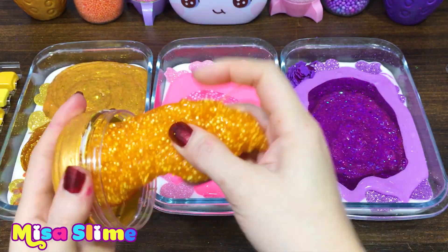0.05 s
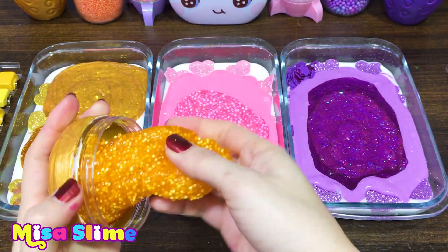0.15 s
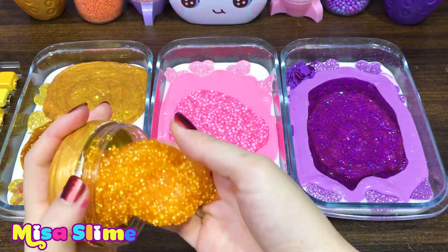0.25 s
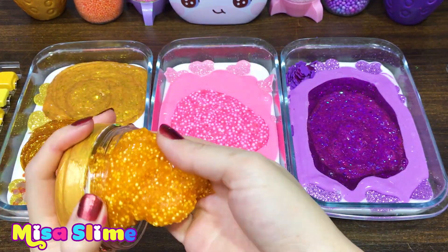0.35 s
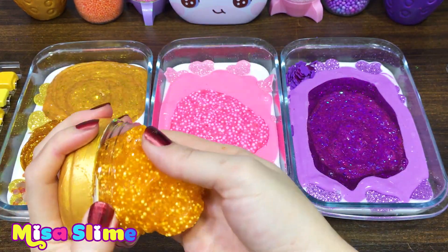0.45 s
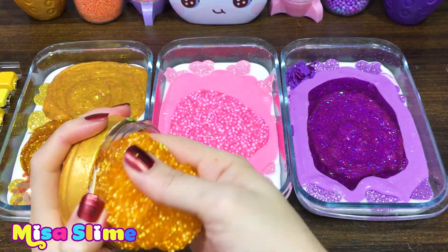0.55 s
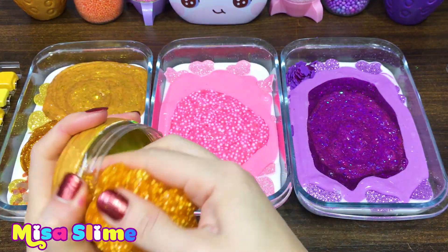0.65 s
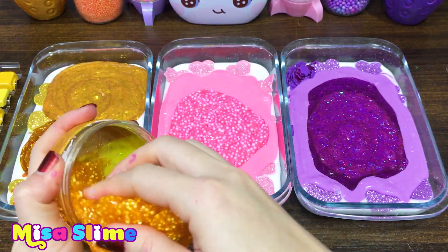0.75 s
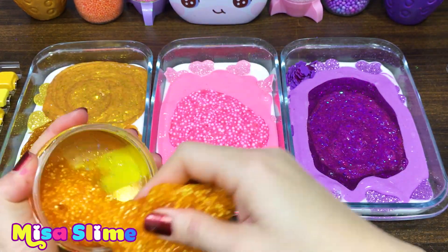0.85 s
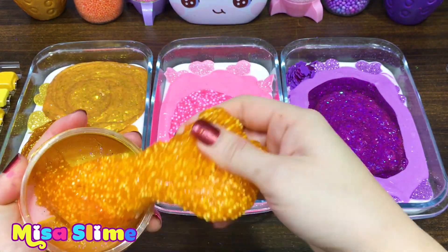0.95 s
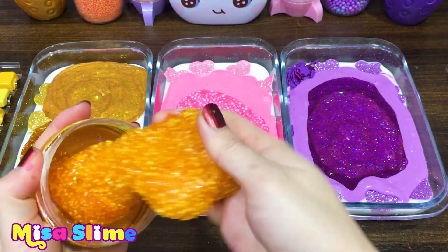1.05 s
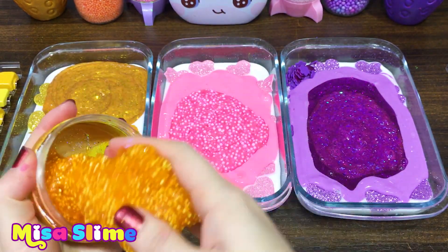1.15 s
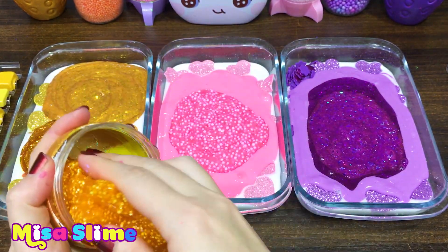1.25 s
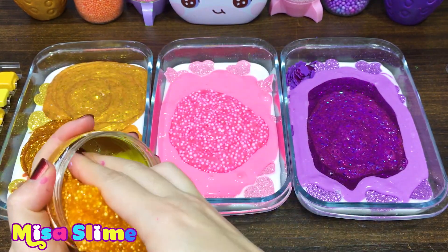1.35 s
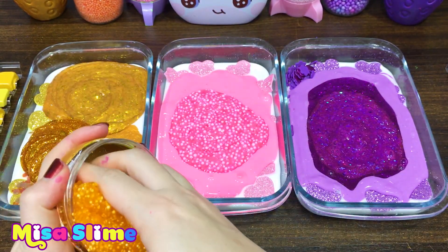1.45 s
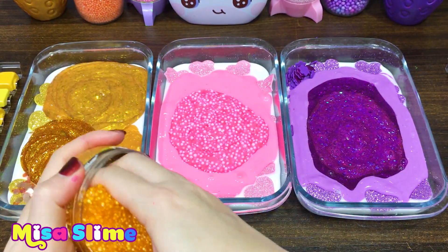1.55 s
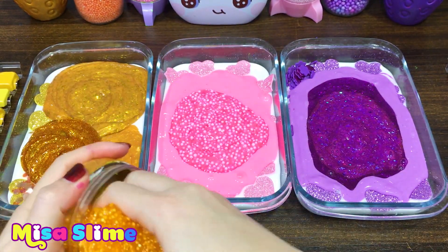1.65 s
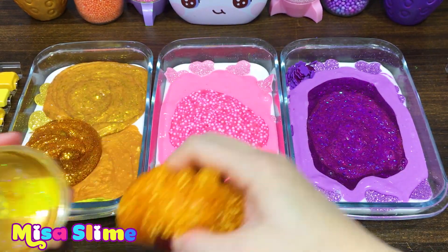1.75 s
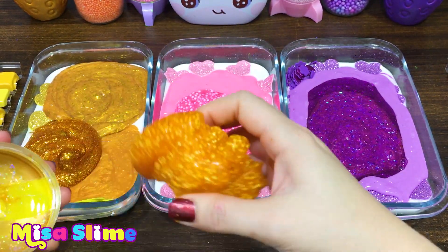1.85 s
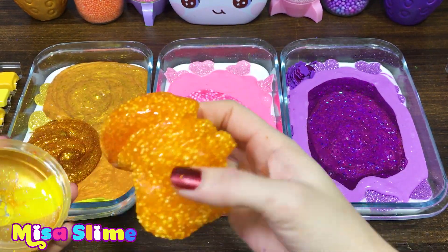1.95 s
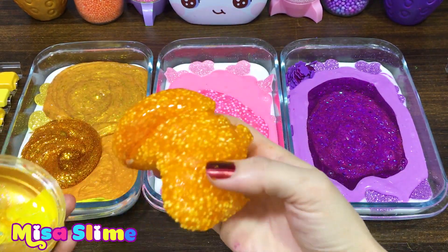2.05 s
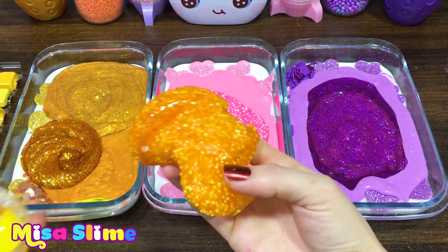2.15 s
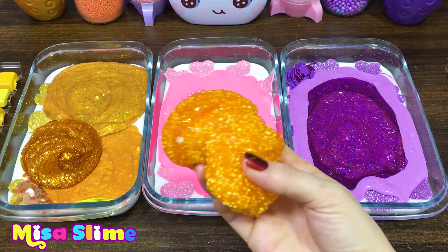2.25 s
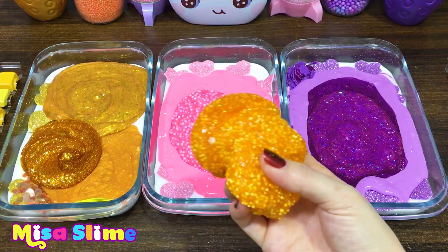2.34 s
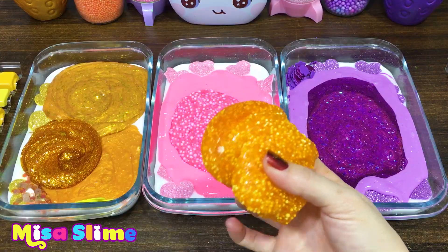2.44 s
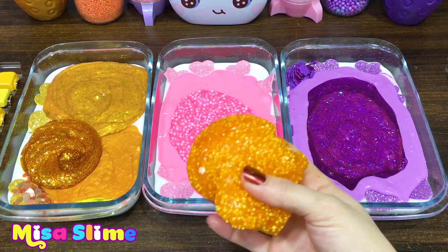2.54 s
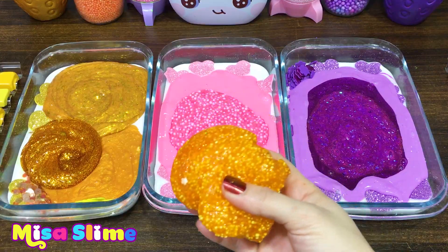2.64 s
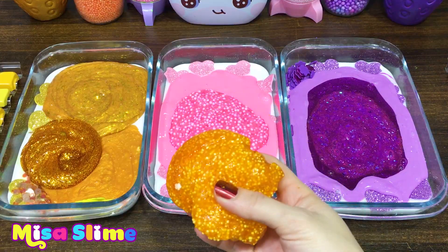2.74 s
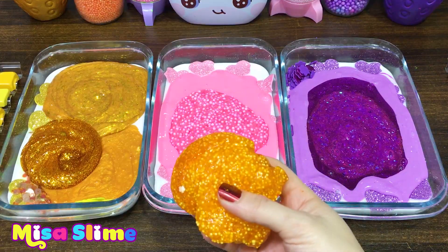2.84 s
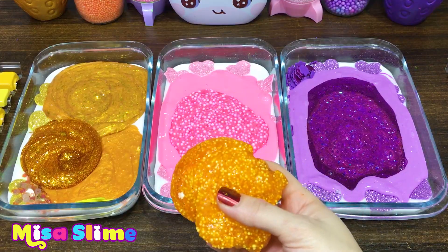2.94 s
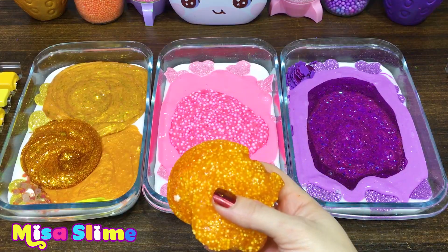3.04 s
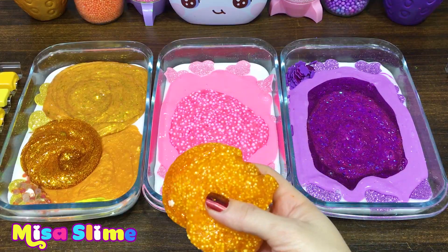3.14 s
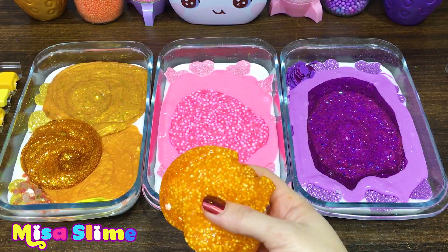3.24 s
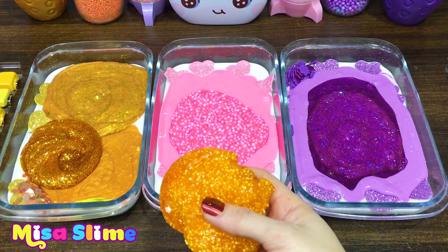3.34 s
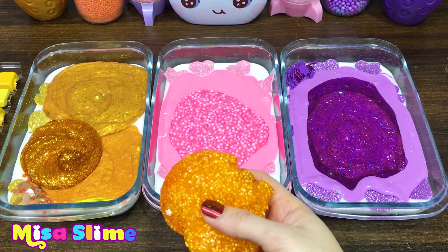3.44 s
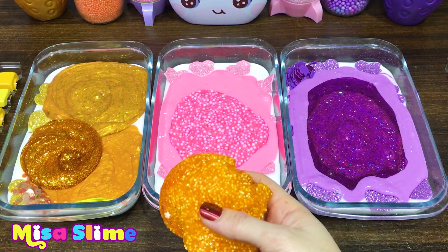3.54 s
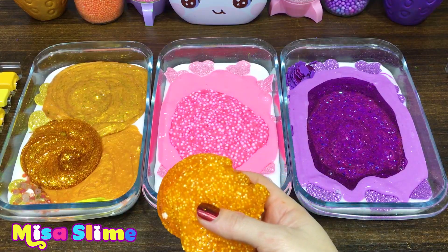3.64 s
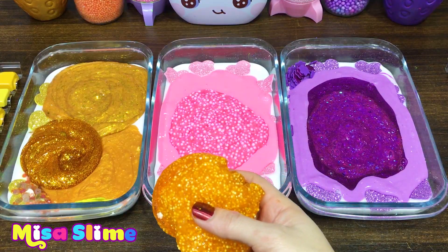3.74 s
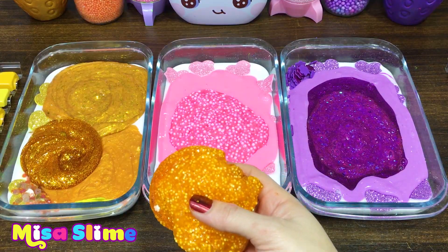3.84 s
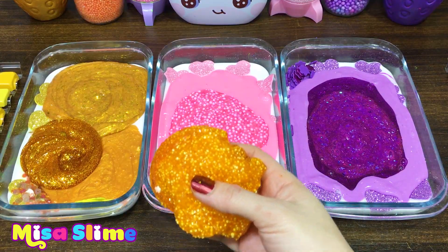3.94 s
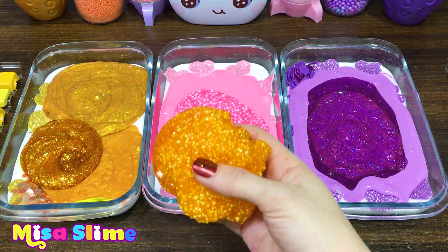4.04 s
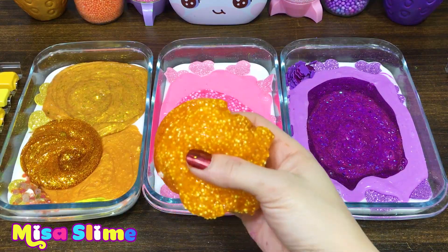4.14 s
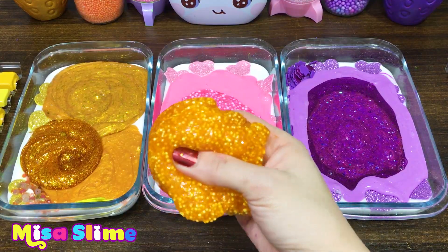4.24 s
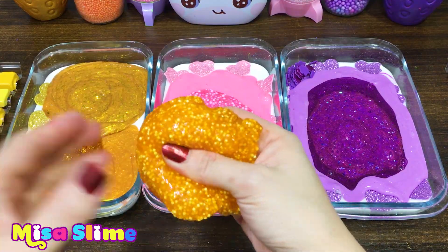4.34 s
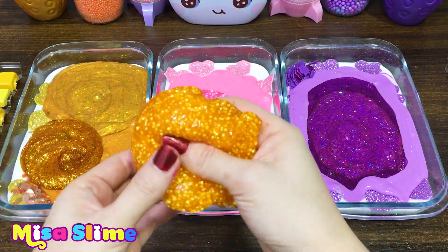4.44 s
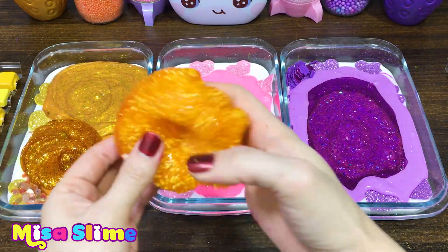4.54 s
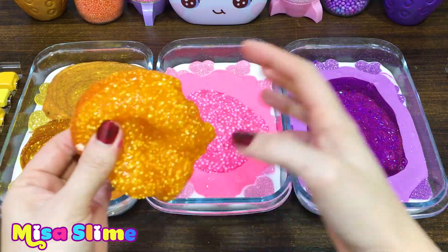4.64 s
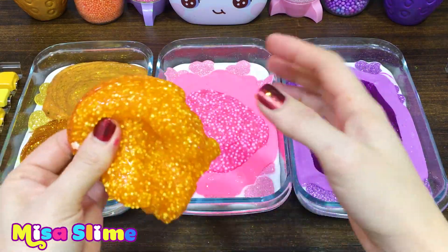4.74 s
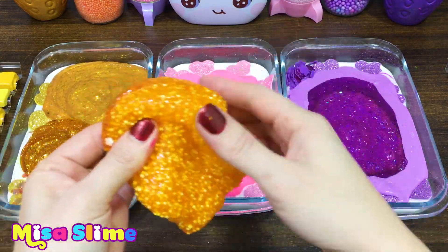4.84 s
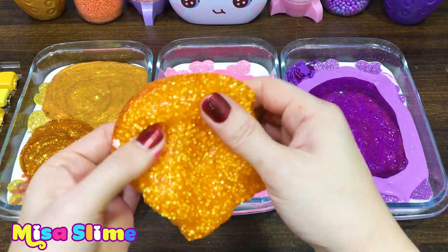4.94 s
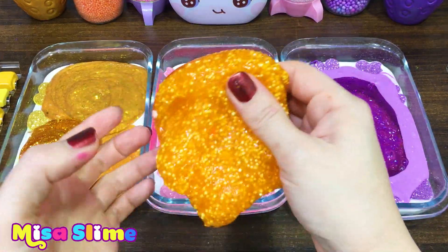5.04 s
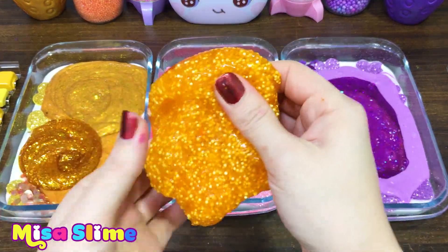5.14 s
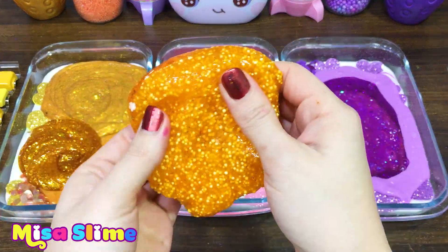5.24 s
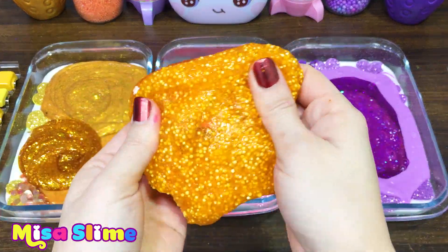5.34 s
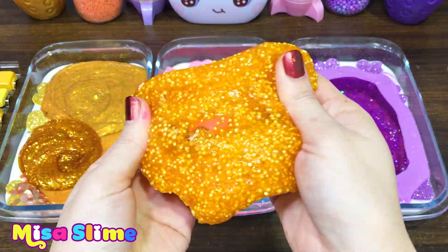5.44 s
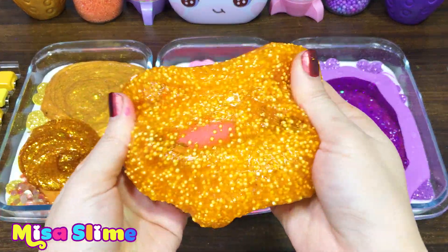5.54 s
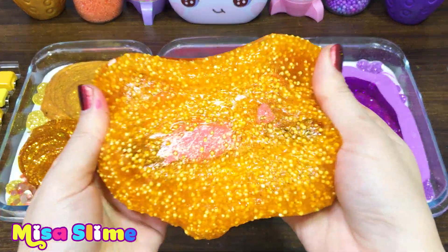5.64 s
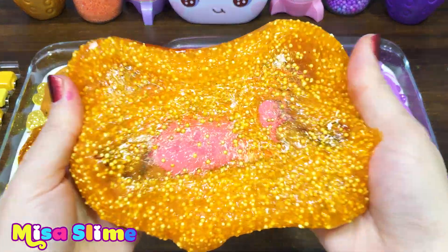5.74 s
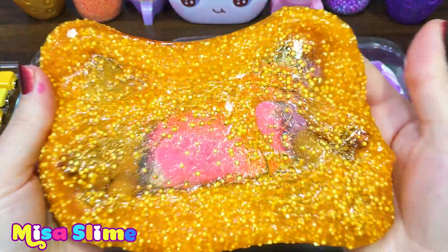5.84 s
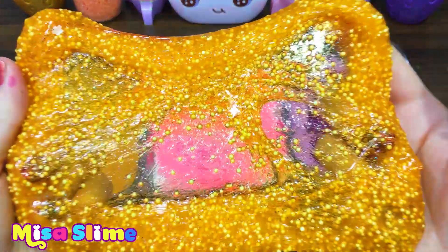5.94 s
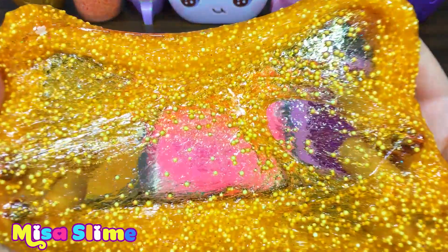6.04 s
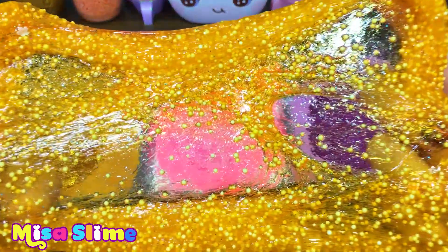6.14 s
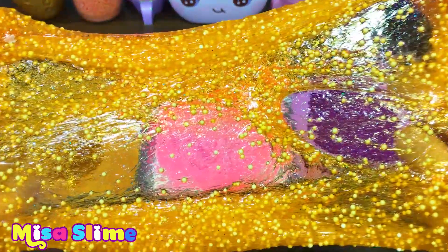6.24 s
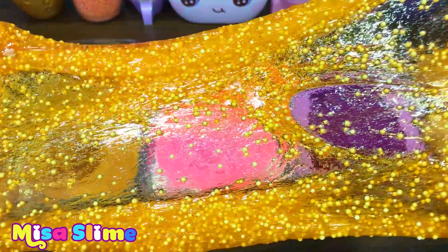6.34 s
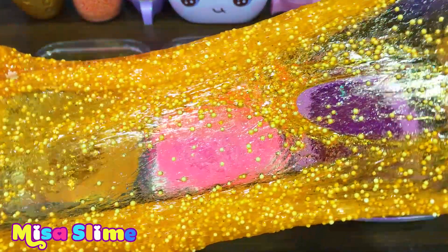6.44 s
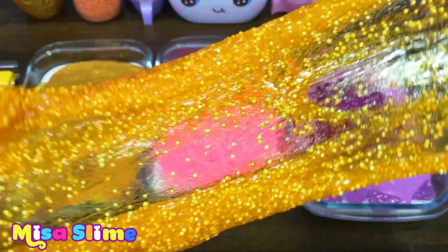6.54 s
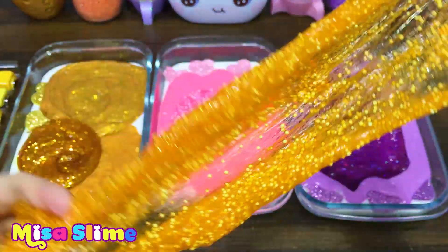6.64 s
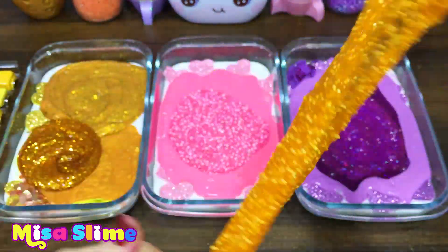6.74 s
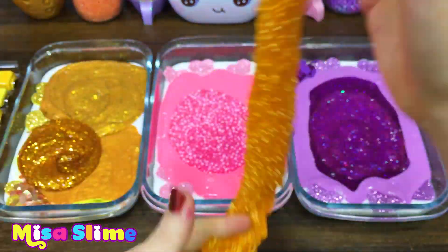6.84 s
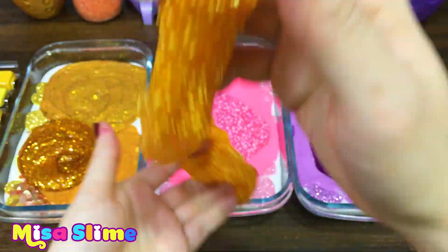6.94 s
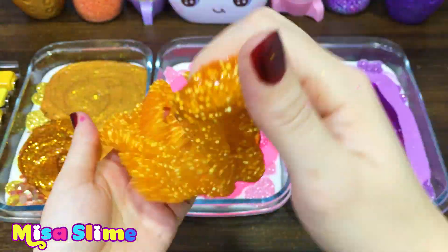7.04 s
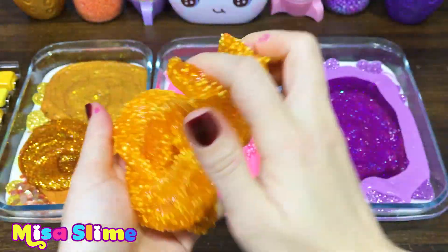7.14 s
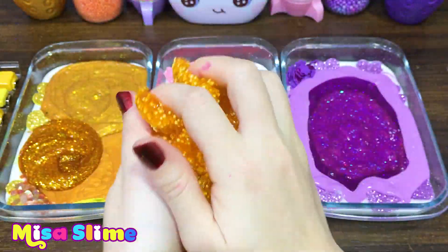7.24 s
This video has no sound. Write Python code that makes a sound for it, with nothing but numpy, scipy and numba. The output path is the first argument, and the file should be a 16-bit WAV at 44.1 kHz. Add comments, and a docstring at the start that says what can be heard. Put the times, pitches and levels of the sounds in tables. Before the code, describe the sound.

Close, detailed slime handling in a quiet small room with faint steady low rumble and hiss. From 0 to 2 s, fingers pull beady, sticky slime from a small plastic tub: short uneven bursts of bright dense crackle, sharp snaps and hollow pops, busiest near 0.2, 0.9 and 1.1 s. Small squelches and dull slaps join around 1.6 s, and the strongest wet pop comes at 1.9 s. Sparse clicks fade until about 2.9 s. Between 3.2 and 4.2 s the tub is put aside, tapping lightly on the table, with a quick cluster of knocks and the hardest at 4.1 s. After a pause, a sudden loud sticky crackle and soft thud arrive at 4.7 s, with another pop at 5.2 s. From 5.5 to 7.3 s the slime is stretched between two hands: thinner, quieter fizz, small scattered pops, dull rubbing, soft flops and a gentle low rumble.

```python
"""Glitter slime is pulled out of a small plastic tub, close by, in a quiet room of steady rumble and hiss.
Tearing threads crackle as click trains, air pockets ring over the hollow tub, fingers rub as dull noise;
films pop, folds squelch as bursts of filtered noise, and the lump slaps the hand with a damped thud.
From 3.2 to 4.2 s the tub is put aside: light knocks ring tub and table as damped modes.
From 4.7 s the slime is pulled again, then squeezed and stretched between two hands, with a low rumble."""
import sys
import numpy as np
from scipy import signal
from scipy.fft import rfft, irfft
from scipy.io import wavfile
from scipy.ndimage import uniform_filter1d
from numba import njit

SR = 44100
rng = np.random.default_rng(int(sys.argv[2]) if len(sys.argv) > 2 else 0)


def master_out(mix):
    """Clip the mix to full scale and print it as 16-bit PCM to the path in sys.argv[1]."""
    frames = np.transpose(np.atleast_2d(mix))
    ceiling = np.clip(frames, -1, 1)
    pcm = np.round(ceiling * 32767).astype(np.int16)
    wavfile.write(sys.argv[1], SR, pcm)


N = 321048
TIME_S = np.arange(N) / SR


def undb(db):
    """Decibels to amplitude."""
    return 10 ** (np.asarray(db) / 20)


def unit(x):
    """Scale to rms 1."""
    return x / np.sqrt(np.mean(x ** 2))


def burst(x, seconds):
    """Scale a short sound to the energy of rms 1 held for that long."""
    return x * np.sqrt(seconds * SR / np.sum(x ** 2))


def even(x, seconds):
    """Scale to a running rms near 1, keeping the fine grain."""
    size = int(seconds * SR / 2)
    power = uniform_filter1d(uniform_filter1d(x ** 2, size), size)
    floor = np.mean(x ** 2) / 100
    return x / np.sqrt(power + floor)


def add(out, start_s, x):
    """Mix x into out at start_s."""
    i = max(int(start_s * SR), 0)
    out[i:i + len(x)] += x[:N - i]


def noise(count):
    """White noise, rms about 1."""
    return rng.standard_normal(count)


def band(x, hz, width_hz):
    """One resonance."""
    return signal.lfilter(*signal.iirpeak(hz, hz / width_hz, fs=SR), x)


def double_band(x, hz, width_hz):
    """Two equal resonances in series: steeper skirts."""
    return band(band(x, hz, width_hz), hz, width_hz)


def colour(x, points, size=4096):
    """Causal minimum-phase filter through (freq_hz, gain_db) points."""
    hz, db = np.transpose(points)
    bins_hz = np.maximum(np.arange(size // 2 + 1) * SR / size, 1)
    gain = undb(np.interp(np.log(bins_hz), np.log(hz), db))
    cepstrum = irfft(np.log(gain))
    # fold the cepstrum onto positive time
    cepstrum[1:size // 2] *= 2
    cepstrum[size // 2 + 1:] = 0
    impulse = irfft(np.exp(rfft(cepstrum)))
    return signal.fftconvolve(x, impulse)[:len(x)]


def fade(t, t60):
    """Exponential decay, -60 dB at t60 seconds."""
    return np.exp(-np.log(1000) * t / t60)


def ring(t, hz, t60):
    """A damped sine."""
    return np.sin(2 * np.pi * hz * t) * fade(t, t60)


def walk(steps_per_s):
    """A smooth random drift, zero mean, spread a little below 1."""
    k = int(SR / steps_per_s)
    steps = np.repeat(noise(N // k + 1), k)
    return 0.9 * uniform_filter1d(steps, k)[:N]


@njit
def glide(x, hz, damping):
    """A state-variable resonance whose centre moves every sample."""
    y, b, l = np.empty(len(x)), 0., 0.
    for i in range(len(x)):
        g = np.tan(np.pi * hz[i] / SR)
        v = (b + g * (x[i] - l)) / (1 + g * (g + damping))
        b, l, y[i] = 2 * v - b, l + 2 * g * v, damping * v
    return y


def clicks(rate_per_s, spread_db):
    """Random impulses of either sign and widely scattered size."""
    at = np.flatnonzero(rng.random(N) < rate_per_s / SR)
    out = np.full(N, 1e-18)
    size, side = rng.standard_normal((len(at), 2)).T
    out[at] = np.sign(side) * undb(spread_db * np.clip(size, -2, 2.5))
    return out


def grains(rate_per_s, low_hz, high_hz, t60_cycles, spread_db, count=16):
    """Random tiny cavities bursting: each rings a few cycles at one of count pitches, at scattered strength."""
    out = np.zeros(N)
    for hz in np.geomspace(low_hz, min(high_hz, SR / 2 - 2000), count):
        pole = np.exp((2j * np.pi - np.log(1000) / t60_cycles) * hz / SR)
        feedback = [1, -2 * pole.real, abs(pole) ** 2]
        hits = clicks(rate_per_s / count, spread_db)
        out += hz / low_hz * signal.lfilter([0, pole.imag], feedback, hits)
    return out


# steady room spectrum: freq_hz, gain_db
ROOM_SPECTRUM = [(15, -74), (25, -21.5), (47, -8.5), (70, -2.5), (134, -7.5), (212, -10), (354, -13),
                 (394, -12.5), (463, -13.5), (516, -17), (1100, -23), (1440, -24), (1890, -23.5),
                 (3520, -27), (6300, -28.5), (8300, -27.5), (13500, -32), (16000, -30.5)]
ROOM_DB = -65
HANDS_START_S, HANDS_END_S, HANDS_FADE_S, HANDS_DB = 5.6, 7.28, .25, -68.5


def background():
    """Steady room rumble and hiss, plus the low rumble of near hands during the big stretch."""
    air = unit(colour(noise(N), ROOM_SPECTRUM))
    hands = unit(band(band(noise(N), 86.2, 88.1), 89.0, 210))
    edge_s = np.minimum(TIME_S - HANDS_START_S, HANDS_END_S - TIME_S)
    near = np.clip(edge_s / HANDS_FADE_S, 0, 1)
    return undb(ROOM_DB) * air + undb(HANDS_DB) * near * hands


PULL_ATTACK_S, PULL_RELEASE_S = .017, .011  # time constants of gripping and letting go


def grip(start_s, end_s):
    """Exponential attack up to start_s, hold to end_s, exponential release."""
    attack = np.maximum(start_s - TIME_S, 0) / PULL_ATTACK_S
    release = np.maximum(TIME_S - end_s, 0) / PULL_RELEASE_S
    return np.exp(-attack - release)


# pulls that peel slime off plastic or skin until it lets go:
# start_s, length_s, end_snap_db, swell_db (rise from start to end), pocket_db (relative to snaps)
PULLS = [(0.0, 0.029, -44, -4, -5), (0.039, 0.19, -47.5, 5, -9.5), (0.251, 0.053, -66, -5, -1.5),
         (.345, .085, -56, 4, -5), (0.754, 0.13, -52, 8, -4), (0.906, 0.098, -54, -1, -5.5),
         (1.015, 0.11, -42, 5, -7.5), (1.14, 0.068, -53, 1, -3.5), (1.258, 0.032, -52.5, 4, -5),
         (1.506, 0.19, -60, 1, -3.5), (1.719, 0.17, -50.5, 4, 1), (1.888, 0.038, -34, 14, 1),
         (1.947, .15, -68, -13, -15), (2.263, 0.054, -67, -5, -17), (2.582, 0.026, -62.5, 3, -5),
         (2.942, 0.027, -69, 2.5, -11), (4.718, 0.01215, -50, 5, -6), (4.738, .03, -48, -5, -9.5),
         (4.795, 0.04, -51.5, 9, -4), (5.181, 0.051, -52.5, 0, -8), (5.571, 0.2, -67, 3, -19),
         (5.784, .35, -61, -0.5, -14), (5.968, .025, -51, 6, -25), (6.15, 0.31, -71, -8, -8),
         (6.619, 0.14, -62, 6, -8.5), (6.859, 0.067, -60.5, 7, -1.5)]
# slime clinging to moving fingers between pulls: start_s, end_s, level_db
CLINGS = [(0, 2.65, -73), (5.47, 7.28, -75)]
CLING_POCKET_DB = -3.5  # relative to the cling
JERK_DB, JERKS_PER_S = 1.0, 45  # scale and step rate of the random level drift


def effort():
    """Snap and pocket levels in dB: each pull swells or eases evenly, and the slime comes away in small jerks."""
    snaps = pockets = np.full(N, 1e-5)
    for start_s, length_s, end_db, swell_db, pocket_db in PULLS:
        end_s = start_s + length_s
        remaining = np.clip((end_s - TIME_S) / length_s, 0, 1)
        pull = grip(start_s, end_s) * undb(end_db - swell_db * remaining)
        snaps = np.maximum(snaps, pull)
        pockets = np.maximum(pockets, pull * undb(pocket_db))
    for start_s, end_s, level_db in CLINGS:
        cling = grip(start_s, end_s) * undb(level_db)
        snaps = np.hypot(snaps, cling)
        pockets = np.hypot(pockets, cling * undb(CLING_POCKET_DB))
    jerks_db = JERK_DB * walk(JERKS_PER_S)
    return 20 * np.log10(snaps) + jerks_db, 20 * np.log10(pockets) + jerks_db


# spectrum of the snapping threads: freq_hz, gain_db
SNAP_SPECTRUM = [(700, -24), (1300, -8), (2000, -10), (2620, -5), (3200, -5), (4300, -5), (4900, -3.5),
                 (5700, -8.5), (7800, -1.5), (9300, -5.5), (12000, -3), (16000, -7.5)]
SNAPS_PER_S, SNAPS_AT_DB, SNAP_GROWTH = 2100, -54.5, .65  # rate at that level, power-law exponent
TUB_HZ, TUB_WIDTH_HZ = 1680, 200
TUB_SHARE_FULL, TUB_SHARE_EMPTY = 0.41, 0.81
TUB_EMPTY_S, TUB_AWAY_S = 1.95, 2.6


def peeling():
    """Threads snap and air pockets open as the slime lets go; a harder pull makes them denser."""
    snap_db, pocket_db = effort()
    rate_per_s = SNAPS_PER_S * undb(SNAP_GROWTH * (snap_db - SNAPS_AT_DB))
    threads = clicks(rate_per_s, spread_db=1)
    fizz = grains(.6 * rate_per_s, low_hz=2380, high_hz=15700, t60_cycles=11.2, spread_db=5.5)
    snaps = colour(unit(threads) + undb(1.5) * unit(fizz), SNAP_SPECTRUM)
    # a hard pull opens gaps that keep changing shape, so their resonances wander
    folds = np.zeros(N)
    for hz in (3900, 7300):
        wander_hz = np.minimum(hz * np.exp(0.35 * walk(22)), SR / 3)
        folds += glide(snaps, wander_hz, 0.129)
    fold_gain = np.clip((snap_db + 53) / 10, 0, 1.2)  # a thin free sheet has none
    snaps = even(snaps + fold_gain * folds, seconds=0.085)
    pockets = grains(.3 * rate_per_s, low_hz=1030, high_hz=2200, t60_cycles=13, spread_db=4.5, count=12)
    # the emptier the tub, the more it colours the pockets, until it is carried off
    share = np.interp(TIME_S, [0, TUB_EMPTY_S, TUB_AWAY_S], [TUB_SHARE_FULL, TUB_SHARE_EMPTY, 0])
    tub_hz = TUB_HZ * np.exp(.035 * walk(20))  # the fingers shift it a little
    tub = glide(pockets, tub_hz, TUB_WIDTH_HZ / TUB_HZ)
    hollow = even((1 - share) * unit(pockets) + share * unit(tub), seconds=0.035)
    # the soft mass gives a dull patter under each snap
    patter = even(band(threads, 340, 500), seconds=0.039)
    return undb(snap_db) * (snaps + undb(-24.5) * patter) + undb(pocket_db) * hollow


RUB_DB, RUB_HZ, RUB_WIDTH_HZ = -78, 370, 410  # centre of the drifting level; resonance


def rubbing():
    """Fingers slide dully over the lump for as long as it clings to them."""
    working = sum(grip(start_s, end_s) for start_s, end_s, _ in CLINGS)
    rub = unit(double_band(noise(N), RUB_HZ, RUB_WIDTH_HZ))
    return working * undb(RUB_DB + 3.8 * walk(9)) * rub


# spells of small stray pops: start_s, end_s, pops_per_s, snap_db, pocket_db
SPELLS = [(.64, 0.722, 43, -56.5, -76), (1.5, 1.73, 17, -66, -62), (2.029, 2.14, 17.6, -63.5, -66),
          (5.52, 6.36, 12, -59, -67)]
STRAY_SNAP_HZ, STRAY_POCKET_HZ, STRAY_TEAR_MS = 5560, 1630, 1  # medians
STRAY_SPREAD_DB, STRAY_SNAP_OCTAVES, STRAY_POCKET_OCTAVES = 3.5, 0.89, 0.35


def stray_pops():
    """Small pops at loose intervals through each spell, each with its own size and pitch."""
    rows = []
    for start_s, end_s, rate_per_s, snap_db, pocket_db in SPELLS:
        count = max(round((end_s - start_s) * rate_per_s), 1)
        chances = np.clip(rng.standard_normal((count, 5)), -2, 2)
        for k, (size, high, depth, wide, slow) in enumerate(chances):
            pop_s = start_s + (end_s - start_s) * (k + rng.random()) / count
            snap_hz = min(STRAY_SNAP_HZ * 2 ** (STRAY_SNAP_OCTAVES * high), SR / 3)
            pocket_hz = STRAY_POCKET_HZ * 2 ** (STRAY_POCKET_OCTAVES * wide)
            rows.append((pop_s, snap_db + STRAY_SPREAD_DB * size, snap_hz,
                         pocket_db + STRAY_SPREAD_DB * depth, pocket_hz, STRAY_TEAR_MS * 2 ** slow))
    return rows


# loudest pops: start_s, snap_db, snap_hz, pocket_db, pocket_hz (at onset), tear_ms
LOUD_POPS = [(0.134, -62, 7000, -50, 1940, 1.8), (0.1827, -54, 9000, -50, 1860, 1.27),
             (0.2061, -35.5, 8750, -49, 1340, 1.4), (0.2488, -42, 8900, -48, 1796, 2.95),
             (0.2749, -46, 8000, -46, 1260, 1.14), (0.6487, -59.5, 4550, -83, 2020, 0.33),
             (0.68, -55.5, 4800, -83, 2090, 0.4), (0.74, -46.5, 11400, -73, 1610, 0.8),
             (0.8343, -39.5, 7920, -50, 1660, 0.69), (0.8513, -46, 10460, -43, 1663, 0.35),
             (0.884, -37.5, 8300, -46, 1530, 0.2), (0.8978, -40, 10800, -54, 1610, 0.2),
             (1.019, -53, 3400, -44.5, 1590, 1.4), (1.086, -36.5, 5620, -44, 1940, 0.37),
             (1.0927, -38.5, 7700, -58.5, 2130, 0.3), (1.1002, -48, 5260, -40.5, 1880, 1.5),
             (1.1113, -38, 3370, -39, 2040, 0.91), (1.1892, -41, 8100, -45.5, 1976, 0.76),
             (1.2568, -45, 2900, -36, 1900, 0.98), (1.2695, -48, 11500, -53, 1180, 0.94),
             (1.3634, -55, 9340, -56, 1928, 4), (1.5246, -53, 7760, -68, 2380, 0.59),
             (1.5684, -46, 8400, -42.5, 1549, 0.77), (1.6167, -45, 4030, -47, 1726, 1.95),
             (1.6686, -48, 3560, -53.5, 1760, 1.9), (1.8745, -39, 7900, -44, 1676, 0.9),
             (1.9007, -44, 7000, -35, 1640, 0.88), (1.923, -29.5, 7500, -40, 1600, 1.4),
             (1.928, -29, 7085, -34.5, 1662, 2.52), (2.0966, -58.5, 9980, -57.5, 1490, 2.35),
             (2.1249, -61, 6800, -58.5, 1620, 1.6), (2.2665, -41.5, 7620, -47, 1660, 1.3),
             (2.3019, -55, 4470, -56, 1620, 1.4), (4.3904, -60, 8200, -75.5, 1080, 0.94),
             (4.7325, -37.5, 7504, -47, 1339, 4.6), (4.737, -39.5, 5644, -49.5, 1550, 2),
             (4.7505, -36, 4430, -67, 1940, 0.67), (4.7716, -46, 5550, -47, 1900, 2.06),
             (5.1923, -42.5, 8230, -49.5, 2348, 4.4), (5.221, -45.5, 2740, -41, 1610, 3),
             (5.566, -54.5, 4110, -64, 1444, 1.2), (5.6371, -51.5, 7300, -58, 1844, 0.53),
             (5.7845, -52, 12000, -53, 1880, 1.33), (5.8109, -52, 11100, -66.5, 2040, 0.18),
             (5.9899, -53, 3500, -78, 1360, 6.7), (6.1162, -57, 8900, -63, 1533, 1.06),
             (6.2818, -52.5, 7150, -58, 2014, 0.67), (6.3008, -54.5, 3000, -77, 2390, 0.39),
             (6.402, -55, 7100, -64, 1202, 0.31), (6.4105, -58.5, 4060, -78, 1902, 2.25),
             (6.4565, -63, 2793, -60, 1244, 1.5), (6.497, -57.5, 7760, -70, 1490, 0.45),
             (6.6235, -52, 4290, -60, 1326, 2.3), (6.658, -57.5, 3980, -65, 2200, 0.47),
             (6.7472, -50.5, 5330, -66, 2340, 0.45)]
SNAP_WIDTH = .28  # bandwidth / pitch
POCKET_T60_S, POCKET_RISE_PER_S = .0093, 4.8
POP_LEVEL_S = .004  # pop levels are rms held this long


def pops():
    """A film tears in a quick run of snaps, and the pocket behind it rings."""
    out, t = np.zeros(N), np.arange(SR // 30) / SR
    for start_s, snap_db, snap_hz, pocket_db, pocket_hz, tear_ms in LOUD_POPS + stray_pops():
        # one clean break, then smaller snaps as the tear runs on
        run = noise(len(t)) ** 3 * np.exp(-(t * 1000 / tear_ms) ** 2)
        tear = 0.76 * burst(run, 1 / SR)
        tear[0] += .7
        snap = band(tear, snap_hz, SNAP_WIDTH * snap_hz) + undb(-11.0) * band(tear, 6500, 8600)
        # the pitch rises a little as the pocket opens
        pocket = ring(t * (1 + POCKET_RISE_PER_S * t), pocket_hz, POCKET_T60_S)
        pocket *= 1 - fade(t, t60=0.00058)
        pop = undb(snap_db) * burst(snap, POP_LEVEL_S) + undb(pocket_db) * burst(pocket, POP_LEVEL_S)
        add(out, start_s, pop)
    return out


# wet squelches: centre_s, level_db, pitch_hz, half_length_s (centre to 1/e)
SQUELCHES = [(0.338, -55.5, 8230, 0.014), (0.371, -55.5, 1870, 0.0091), (1.039, -50, 3360, 0.016),
             (1.113, -42.5, 3282, 0.012), (1.197, -58, 8000, 0.016), (1.872, -52, 7695, 0.022),
             (1.942, -39.5, 4000, 0.004), (4.753, -45, 4130, 0.011), (4.75, -52, 1237, 0.012),
             (5.786, -62, 2090, 0.026), (6.027, -61.5, 3197, 0.0293), (6.845, -64.5, 2280, 0.018)]


def squelches():
    """Air sputters through a narrow fold, swelling and fading at the fold's own pitch."""
    out = np.zeros(N)
    for centre_s, level_db, hz, half_s in SQUELCHES:
        t = np.arange(-2 * half_s, 2 * half_s, 1 / SR)
        sputter = noise(len(t)) ** 3 * np.exp(-(t / half_s) ** 2)
        squelch = burst(double_band(sputter, hz, .3 * hz), half_s)
        add(out, centre_s - 2 * half_s, undb(level_db) * squelch)
    return out


# soft slaps of the lump on the hand: start_s, level_db, pitch_hz, t60_s (of the blur; the ring takes half)
SLAPS = [(1.568, -38.5, 273, 0.017), (1.618, -48.5, 475, 0.021), (1.923, -58, 480, 0.022),
         (1.938, -48.5, 180, 0.066), (4.773, -38.5, 260, 0.024), (5.221, -51.5, 377, 0.037),
         (6.0, -53, 140, 0.13), (6.344, -52.5, 87, 0.13), (6.903, -55, 473, 0.19), (6.92, -53, 248, 0.184)]


def slaps():
    """The heavy lump flops against the hand: a short dull thud, blurred because the mass is soft."""
    out, t = np.zeros(N), np.arange(SR // 6) / SR
    for start_s, level_db, hz, t60_s in SLAPS:
        blur = unit(double_band(noise(len(t)), hz, 0.68 * hz))
        thud = 1.6 * ring(t, hz, t60_s / 2) + 0.86 * blur * fade(t, t60_s)
        add(out, start_s, undb(level_db) * thud)
    return out


# tub knocking on the table: start_s, level_db, contact_hz (sets the filter corners), tick_db (relative)
KNOCKS = [(3.2266, -45, 2800, -16), (3.4443, -45.5, 1540, -17), (3.583, -60, 706, -30.5),
          (3.6845, -50.5, 1730, -9), (3.8725, -53, 940, -18.5), (3.993, -57, 900, -18),
          (4.037, -53.5, 1210, -15), (4.072, -48.5, 2200, -12), (4.0856, -45, 2600, -11),
          (4.0922, -35, 4300, -18.5), (4.108, -43.5, 3400, -17), (4.139, -47, 2410, -16)]
# tub and table top ringing together, before detuning: freq_hz, level_db, t60_s
TABLE_MODES = [(329.5, -0.5, 0.13), (427, -1, 0.19), (551, -6.5, 0.16), (640, -5, 0.12), (822, -5.5, 0.095),
               (1105, -15, 0.081), (1390, -12, 0.048), (1480, -4, 0.059), (1731, 3.5, 0.086),
               (1827, -1.5, 0.18), (2320, -27, 0.089), (2505, -3.5, 0.076), (2560, -8, 0.17),
               (2775, -12, 0.135), (4550, -8, 0.064), (4900, -18, 0.14), (5290, -17, 0.3), (6970, -18, .06),
               (8600, 1, 0.047)]
# spectrum of the contact noise: freq_hz, gain_db
CLACK_SPECTRUM = [(120, -12), (200, -12), (400, -0.5), (900, -7), (1750, -4.5), (2600, -14), (3400, -25.5),
                  (5300, -28), (8000, -12), (16000, -13)]


def knocks():
    """Each knock has another spot and grip, so the modes shift and mix anew; soft contacts are duller."""
    out, t = np.zeros(N), np.arange(SR // 3) / SR
    for start_s, level_db, contact_hz, tick_db in KNOCKS:
        chance = rng.standard_normal((len(TABLE_MODES), 3))
        detune = 1 + .015 * chance[:, 2]
        modes = np.zeros(len(t))
        for (side, size, _), shift, (hz, mode_db, t60_s) in zip(chance, detune, TABLE_MODES):
            modes += np.sign(side) * undb(mode_db + 2 * size) * ring(t, hz * shift, t60_s)
        clack_fade = fade(t, t60=0.011) + undb(-8.5) * fade(t, t60=0.21)
        clack = colour(noise(len(t)) * clack_fade, CLACK_SPECTRUM)
        knock = unit(modes) + undb(2.0) * unit(clack)
        knock = signal.lfilter(*signal.butter(2, min(1.27 * contact_hz, SR / 3), fs=SR), knock)
        # a short, hard contact also leaves the lowest modes weaker
        knock = signal.lfilter(*signal.butter(1, contact_hz / 6, "high", fs=SR), knock)
        # the plastic rim gives a dry tick with two short rings
        tick = ring(t, 5330 * detune[0], t60=0.011) + 0.58 * ring(t, 8400, t60=0.0072)
        tick += 0.92 * noise(len(t)) * fade(t, t60=0.0045)
        mix = unit(knock) + undb(tick_db) * unit(tick)
        add(out, start_s, undb(level_db) * burst(mix, seconds=0.011))
    return out


def room(x):
    """A small room: a few early reflections from the table, then a faint short tail."""
    t = np.arange(SR // 3) / SR
    early = noise(len(t)) ** 3 * fade(t, t60=0.032) * (t > .001)
    late = band(noise(len(t)), 2500, 9000) * fade(t, t60=0.24) * (t > .006)
    echo = undb(-10.5) * burst(early, 1 / SR) + undb(-17) * burst(late, 1 / SR)
    return x + signal.fftconvolve(x, echo)[:N]


def scene():
    """Slime and tub in the room, over its background."""
    slime = peeling() + rubbing() + pops() + squelches() + slaps()
    return (room(slime + knocks()) + background())[None]


TOP_HZ = 15900


def record(dry):
    """Cut the deepest bass below 42 Hz and, steeply, everything above TOP_HZ."""
    lean = signal.sosfilt(signal.butter(2, 42, "high", fs=SR, output="sos"), dry)
    return signal.sosfilt(signal.ellip(10, .2, 70, TOP_HZ, fs=SR, output="sos"), lean)


dry = scene()
out = record(dry)
master_out(out)
```